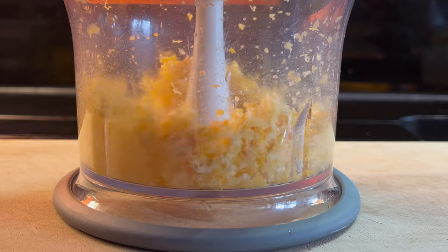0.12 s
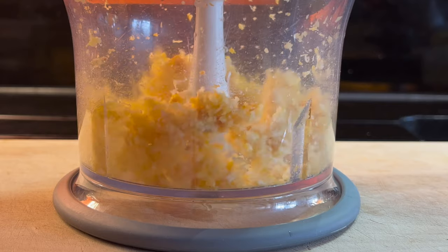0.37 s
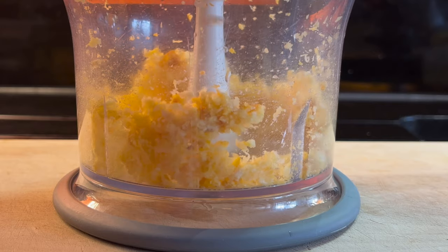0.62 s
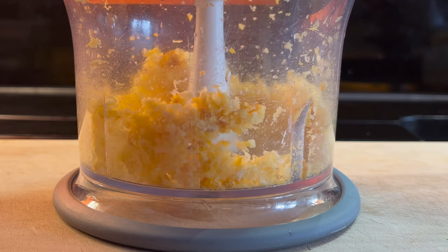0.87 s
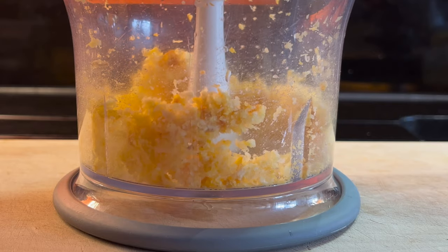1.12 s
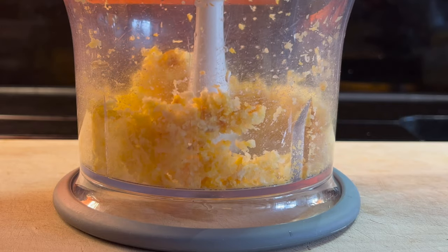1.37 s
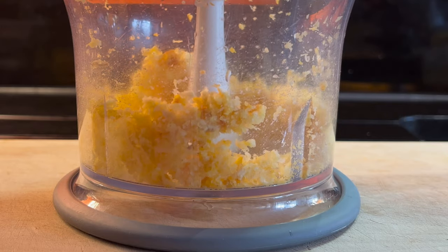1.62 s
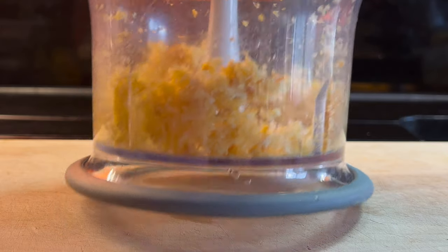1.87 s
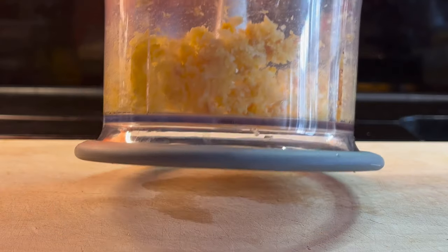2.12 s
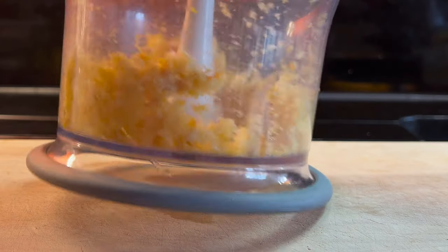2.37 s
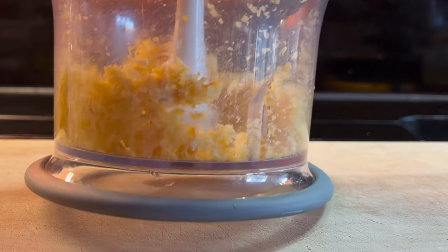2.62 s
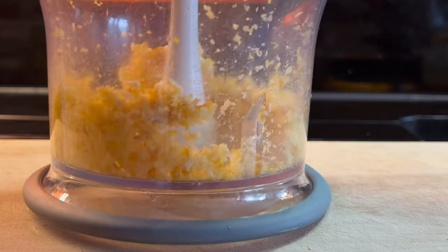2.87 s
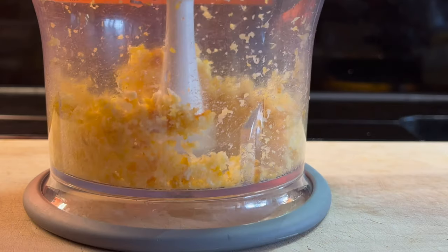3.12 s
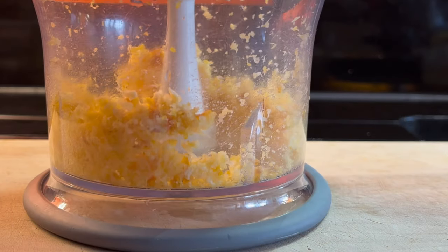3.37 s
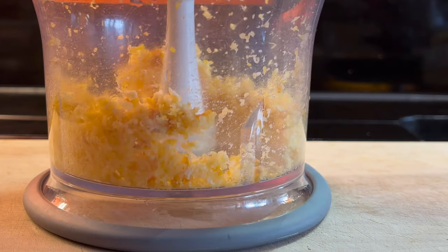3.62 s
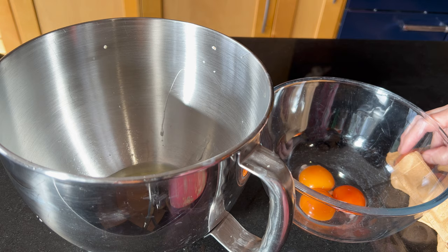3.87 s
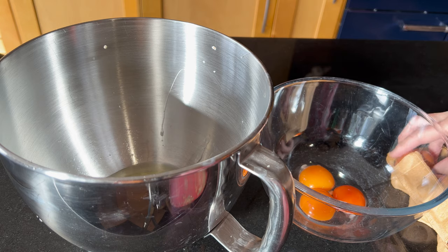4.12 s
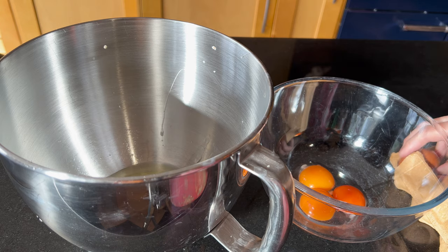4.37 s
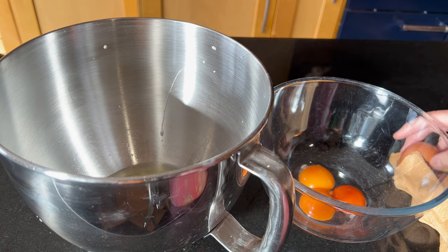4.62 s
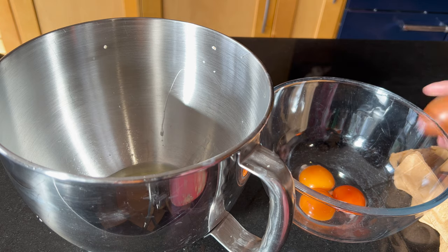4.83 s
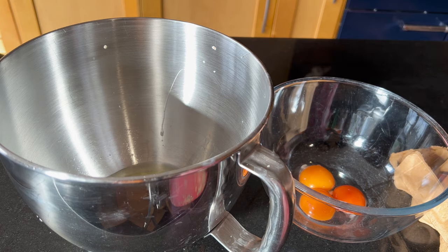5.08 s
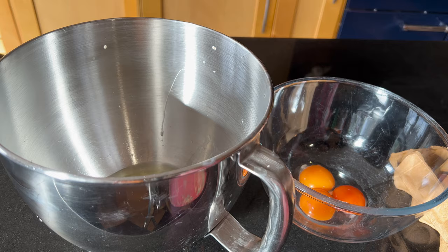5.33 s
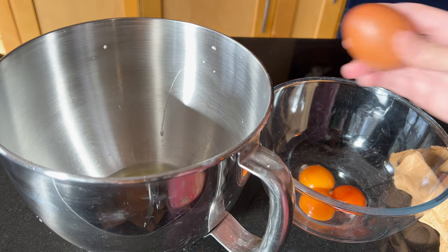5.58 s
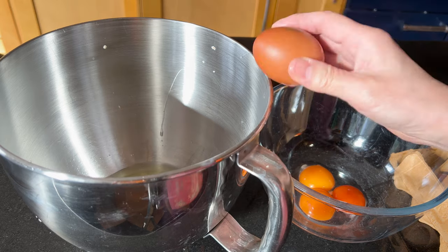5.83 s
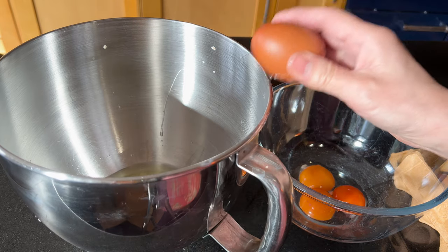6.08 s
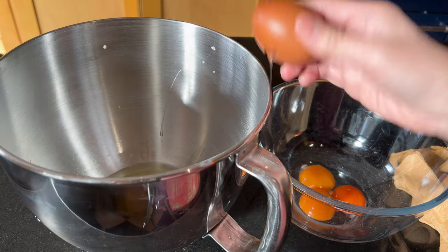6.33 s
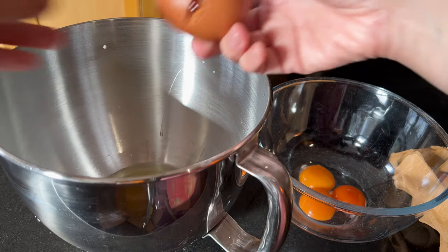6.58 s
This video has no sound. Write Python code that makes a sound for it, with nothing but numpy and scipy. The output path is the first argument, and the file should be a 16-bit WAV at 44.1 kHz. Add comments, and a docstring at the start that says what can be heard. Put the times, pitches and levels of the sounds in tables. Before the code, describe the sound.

Close up, a small electric chopper churns fruit in a plastic cup, with grainy patter, gear whine and lumps knocking the wall. It switches off and runs down, then bursts again. An abrupt change to a quiet, low-humming kitchen brings paper scuffs and tiny clicks, then three egg taps on a steel bowl rim, which rings while its base rocks softly. Close stereo microphones.

```python
"""A small electric chopper whirs through fruit in a plastic cup, twice; each burst fades away.
Motor tones follow a speed curve; churn, patter and cup knocks are shaped noise and ringing modes.
Then a quiet humming kitchen: coloured noise and steady tones, paper scuffs, swishes and ticks.
An egg is tapped three times on the rim of a steel bowl: noise bursts and decaying modes.
The bowl rocks on the worktop and hums. Heard through a close pair of small microphones."""
import sys
import numpy as np
from scipy import signal
from scipy.fft import rfft, irfft, next_fast_len
from scipy.io import wavfile
from scipy.ndimage import uniform_filter1d

SR = 44100
rng = np.random.default_rng(int(sys.argv[2]) if len(sys.argv) > 2 else 0)


def gain_from_db(level_db):
    """Turn a decibel level (scalar or array-like) into a linear amplitude factor."""
    decades = np.asarray(level_db, float) / 20
    return 10 ** decades


def transcribe(signal):
    """Save signal, clipped to [-1, 1], as a 16-bit WAV file at the path in sys.argv[1]."""
    frames = np.atleast_2d(signal).T
    limited = np.clip(frames, -1, 1)
    pcm = np.round(limited * 32767).astype(np.int16)
    wavfile.write(sys.argv[1], SR, pcm)


N = 295902
T_S = np.arange(N) / SR
PAD = next_fast_len(N + SR // 2)
HZ = np.maximum(np.arange(PAD // 2 + 1) * SR / PAD, 1)

# motor runs: (start [s], switch-off [s], faded out [s], gear whine at switch-off [Hz])
MOTOR_RUNS = [(-.5, 1.26, 1.9582, 1003), (2.336, 3.35, 4.1836, 1030)]
# load on the blades: (time [s], chopping level [dB], whine re chopping [dB])
BLADE_LOAD = [(0, -46.5, -7), (.4, -43, -11.5), (.62, -46.5, -5), (.7, -48, -12), (1.2, -48, -13),
              (1.4, -47.5, -24.5), (2.34, -45.5, -26.5), (2.45, -44.5, -2.5), (2.65, -47, -12),
              (2.82, -45.5, -8), (2.95, -45.5, -23), (3.08, -44.5, -21.5), (3.16, -47, -12.5),
              (3.33, -48.5, -19.5), (3.45, -48, -3), (3.55, -47, -7), (3.62, -46, -19.5),
              (3.75, -44.5, -26.5)]
# colour of the churned fruit: (frequency [Hz], density [dB per Hz])
CHURN_COLOUR = [(60, -29.5), (120, -13), (200, -4), (450, -4), (750, -3), (1000, -2.5), (1450, -3.5),
                (1900, -3), (2350, -0.5), (2700, -5.5), (3000, -14), (3600, -14.5), (4200, -27),
                (5000, -43.5)]
# colour of the crumb patter: (frequency [Hz], density [dB per Hz])
PATTER_COLOUR = [(2800, -12.5), (4000, -5), (5200, -6), (6800, -2), (8200, 0), (9700, -4), (10800, 2),
                 (12000, -8.5), (13500, -10.5), (15000, -6.5), (15800, -8), (16300, -47)]
# lumps thrown at the cup wall: (time [s], relative level [dB], relative weight of the low thud [dB])
CUP_KNOCKS = [(0.221, -26.5, -17), (0.297, -27, -34.5), (0.441, -32.5, -31), (0.624, -20.5, -26.5),
              (0.879, -34, -25.5), (0.96, -19.5, -21.5), (1.109, -32, -31.5), (1.167, -32.5, -14.5),
              (1.257, -36.5, -10), (1.638, -37.5, -9.5), (1.678, -57, -6.5), (1.697, -48.5, -4.5),
              (1.79, -54, -6), (2.336, -38, -3.5), (2.349, -33.5, -8), (2.38, -37, -9), (2.412, -40, -9.5),
              (2.434, -45.5, -1.5), (2.614, -26.5, -12.5), (2.762, -40.5, -4.5), (2.812, -37, -3),
              (2.861, -27, -10), (2.887, -34.5, -11), (2.986, -32, -8.5), (2.997, -38.5, -5),
              (3.013, -39.5, -4), (3.061, -36.5, -5.5), (3.074, -24.5, -9.5), (3.085, -34, -10.5),
              (3.097, -28.5, -13.5), (3.303, -28.5, -13), (3.565, -42, -6.5), (3.699, -41, -8.5),
              (3.741, -37, -9.5)]
# cup modes: (frequency [Hz], relative level [dB], t60 [s])
CUP_MODES = [(384, -1.5, 0.053), (598, 6.5, 0.015), (910, -4, 0.013), (1740, -29.5, 0.0049),
             (2307, 1, 0.02), (2815, -8.5, 0.013), (6985, -7.5, 0.016)]
# sagging tones: (start [s], end [s], level [dB], frequency [Hz], sag [Hz/s])
CUP_DRONES = [(2.79, 3.071, -53.5, 614.8, 130), (3.08, 3.268, -56, 369, 18.2)]
# kitchen air: (frequency [Hz], density [dB per Hz])
KITCHEN_COLOUR = [(25, -9.5), (50, 8), (100, 3.5), (200, 1.5), (400, -6), (700, -9.5), (1000, -17),
                  (1500, -23.5), (2500, -18.5), (3100, -22.5), (3550, -21), (4000, -26.5), (5600, -24.5),
                  (7000, -30.5), (10000, -38), (15700, -41), (16300, -65.5)]
# steady appliance tones: (frequency [Hz], level [dB])
APPLIANCES = [(49, -75), (195, -71), (300, -71), (1023, -70), (1793, -85)]
# dull scuffs of a hand among paper and eggs: (peak [s], level [dB], 20 dB rise [s], 20 dB fall [s])
HAND_SCUFFS = [(3.905, -49, 0.0038, 0.0453), (4.04, -53.5, 0.012, 0.0062), (4.33, -68, 0.71, 0.57),
               (4.555, -54, 0.0236, 0.0979), (4.62, -55, 0.005, 0.1822), (4.66, -58, .03, 0.1421),
               (4.86, -58, 0.135, 0.1647)]
# bright swishes of the same hand: (peak [s], level [dB], 20 dB rise [s], 20 dB fall [s])
HAND_SWISHES = [(4.018, -57, 0.008, 0.015), (4.29, -99.5, 0.126, 0.079), (4.71, -45.5, 0.0636, 0.087),
                (4.88, -73.5, 0.22, 0.9), (5.348, -68.5, 0.045, 0.19), (5.758, -67.5, 0.0224, 0.05)]
# small clicks: (time [s], relative level [dB], frequency [Hz])
HAND_TICKS = [(3.906, -36.5, 934), (4.018, -41.5, 1350), (4.0352, -40.5, 1563), (4.152, -42, 1004),
              (4.468, -46.5, 750), (4.552, -46, 1500), (4.6169, -38, 1140), (4.632, -42.5, 1245),
              (4.652, -46, 1710)]
# egg on rim, softer as the shell gives way:
# (time [s], strength [dB], contact [ms], lean to the lower modes [dB])
EGG_TAPS = [(5.903, -10.5, 0.892, 5), (6.096, -12.5, 3.2, -3), (6.291, -17, 6.0, 1.5)]
# hollow knock of the egg: (frequency [Hz], level re mean of strength and crack [dB], t60 [s])
EGG_SHELL = [(1012.4, -11, 0.023), (1296, -10.0, 0.031)]
# steel bowl modes: (frequency [Hz], relative level [dB], t60 [s])
BOWL_MODES = [(602, -4, .25), (680, -4, .5), (896, 0, .13), (1087, -19, .9), (1230, -12, .75),
              (1405, -10, .45), (1555, -8, .42), (1726, -13, .8), (2003, -8, .29), (2185, -9, .28),
              (2406, -3, .12), (2589, -11, .29), (3475, -19, .35), (3677, -24, .2), (4344, -11, .4),
              (4450, -11, .4), (4600, -12, .36), (4912, -5, .28), (5133, -4, .32), (5652, -13, .35),
              (6013, -9, .22), (6400, -14, .3), (6660, -7, .25), (7004, -8, .25), (7300, -9, .26),
              (7461, -7, .27), (7645, -7, .3), (8330, -8, .2)]
# dense upper ring of the bowl: (frequency [Hz], relative density [dB per Hz], t60 [s])
BOWL_SHIMMER = [(303, 0.5, 1), (704, -4, 0.912), (1500, -4.5, 0.514), (2385, 1, 0.395), (3160, -9, .3),
                (3972, -10, 0.61), (4310, 0.5, 0.404), (7907, 2.5, 0.338), (10040, -3.5, .26),
                (10930, -5, 0.22), (13870, -9, .2), (15470, -11, .15), (16500, -21, .05)]
# jolts of the base after every tap: (delay [s], relative level [dB])
BASE_JOLTS = [(.004, -2), (0.0186, 0.5)]
# bowl rocking on its base: (time [s], relative level [dB])
BASE_ROCKS = [(6.01, -17.5), (6.05, -24), (6.148, -29.5), (6.177, -30.5), (6.237, -31.5), (6.359, -18.5),
              (6.389, -38), (6.46, -36.5), (6.567, -38)]
# worktop contact modes: (frequency [Hz], relative level [dB], t60 [s])
BASE_MODES = [(463.7, 2.5, 0.093), (494.2, -1, 0.1854), (367, -12.5, 0.03)]
# microphone pair: (frequency [Hz], left-right likeness [0-1], left re right [dB])
MIC_PAIR = [(100, 0.7, 1), (412, 0.83, -1), (718, 0.3, 0.5), (990, 0.3, 4), (1500, 0.36, 0), (2310, 0.5, 3),
            (3860, 0, 3), (5500, 0, 8.5), (6940, 0, 4), (9655, 1, 1), (9200, 1, -5), (9560, 0.98, -1.5),
            (10218, 0.99, 1.5), (11215, 0.94, -5.5), (11600, 0.4, 8), (13400, 0.9, -2.5), (15000, .6, 1)]
# phase lead of the right side, whatever the direction: (frequency [Hz], phase [half turns])
RIGHT_LEAD = [(6500, 0), (8000, .35), (9000, .7), (9700, .97), (10400, 1.03), (11000, 1.2), (12000, 1.6),
              (13400, 2), (16000, 2.8)]
# where the bowl radiates: (frequency [Hz], left re right [dB])
BOWL_SIDE = [(200, -5.5), (450, 8.5), (700, 10), (1000, -7), (1500, -4.5), (2300, 0.5), (3200, 0),
             (16000, -0.5)]
# remaining noise colours: (frequency [Hz], density [dB per Hz])
RUMBLE_COLOUR = [(25, -18), (60, 7.0), (130, 6), (220, -3.5), (350, -13.0), (600, -39.5)]
SCUFF_COLOUR = [(500, -18.5), (1100, 3), (1800, 3), (3000, -5.5), (5000, -15.5), (7000, -20.0)]
SWISH_COLOUR = [(4000, -8.5), (7000, -2.5), (9000, 7.0), (11000, 1.5), (13500, -5.0), (15700, -16.0),
                (16300, -52.0)]
HISS_COLOUR = [(2000, -18.5), (4000, -5.0), (6000, -1), (15700, -2.5), (16300, -46.5)]
WOBBLE_COLOUR = [(80, -21.0), (125, -3.5), (154, 7.0), (180, -0.5), (280, -43.5)]
DRAUGHT_COLOUR = [(20, -17.5), (50, 6.5), (110, 3.5), (200, -28.5), (400, -91.5)]

WHINE_PER_MOTOR_TURN = 4.5
SPIN_UP_HZ, SPIN_UP_S = 134.45, .1   # speed missing at the start, how fast it is won
CREEP_HZ_PER_S = 20.0   # slow gain as the fruit gets finer
COAST_HZ, COAST_S = 419.4, .25   # without power the whine sinks towards this pitch
COAST_DB_PER_S, COAST_TREBLE_DB_PER_S, COAST_HUM_DB = 12.5, 2, -16.5
COAST_THINS_DB, THIN_BELOW_HZ = -3.0, 750   # idling blades move little fruit: the lows thin out
FADE_S, FADE_LEAVES_DB = 0.848, -40.5
FADE_DULLS = 0.4   # extra share of the fade lost by the treble
FADE_TOE_DB, FADE_TOE_S = -33.5, 0.071   # the fade lands softly
PATTER_DB, PATTER_LOAD_DB = -2.5, -46.5   # patter re chopping, at this load
PATTER_FOLLOWS, PATTER_RISE_S = 0.69, 0.04   # share of the load's swing
MOTOR_HUM_DB = -11   # re chopping
KITCHEN_S, KITCHEN_DB = 3.895, -56
SCUFF_FLOOR_DB, SWISH_FLOOR_DB, RESTLESS_DB = -73.5, -82.5, 2   # until the first tap
CRACK_DB, CRACK_LOSS_DB_PER_MS2 = 12.5, 2.05
CRUNCH_T60_S, CRUNCH_T60_S_PER_MS = 0.019, 0.01004
RING_DB, RING_LEANS = (-22, -16.5, -16), (0.61, 0.94, -0.69)   # low, middle, high modes; lean share
SHELL_DAMPS_DB_PER_MS = 0.88   # a longer touch leaves less lasting ring
WOBBLE_DB, WOBBLE_LOSS_DB_PER_MS = -24.0, 2.5
JOLT_LEANS = 0.584   # share of a tap's lean that reaches the base
HUM_HZ, HUM_T60_S, HUM_DB = 347.07, 2.9, -37.5   # level re each contact
SETTLE_S, SETTLE_DB = 6.335, -37.5   # the bowl settles and hums freely
DRAUGHT_S, DRAUGHT_RISE_S, DRAUGHT_DB = 6.1, .05, -61.5


def rms_one(x):
    """Scale to rms 1."""
    return x / np.sqrt(np.mean(x ** 2) + 1e-20)


def white():
    """White noise of rms 1."""
    return rng.standard_normal(N)


def in_time(rows):
    """Columns of a curve at every sample."""
    s, *columns = np.transpose(rows)
    return [np.interp(T_S, s, c) for c in columns]


def at_hz(rows, hz, axis=1):
    """One column of a frequency table, interpolated over log frequency."""
    return np.interp(np.log(hz), np.log(np.array(rows)[:, 0]), np.array(rows)[:, axis])


def coloured(x, spectrum):
    """Impose a spectrum; rms 1."""
    return rms_one(irfft(rfft(x, PAD) * gain_from_db(at_hz(spectrum, HZ)), PAD)[:N])


def above(x, cut_hz):
    """Steep high-pass."""
    return signal.sosfilt(signal.butter(4, cut_hz, "high", fs=SR, output="sos"), x)


def drift(corner_hz):
    """Slow random wander of spread 1: noise through two equal poles, at SR / 40."""
    r = np.exp(-80 * np.pi * corner_hz / SR)
    slow = signal.lfilter([1], [1, -2 * r, r * r], rng.standard_normal(N // 40 + 2002))[2000:]
    return np.interp(np.arange(N) / 40, np.arange(len(slow)), rms_one(slow))


def clicks(seconds, db):
    """Single-sample impulses of given levels."""
    out = np.full(N, 1e-18)
    out[np.round(np.asarray(seconds) * SR).astype(int)] = gain_from_db(db)
    return out


def ring(x, hz, t60_s):
    """A click sets a sine of its own height ringing."""
    r, w = gain_from_db(-60 / (t60_s * SR)), 2 * np.pi * hz / SR
    return signal.lfilter([0, np.sin(w)], [1, -2 * r * np.cos(w), r * r], x)


def dying(x, t60_s):
    """A click starts an exponential decay."""
    return signal.lfilter([1], [1, -gain_from_db(-60 / (t60_s * SR))], x)


def grains(per_s, spread_db):
    """Random clicks of uneven size; rms 1."""
    sizes = gain_from_db(spread_db * np.minimum(rng.exponential(1, N), 4)) * rng.choice([-1, 1], N)
    return rms_one(sizes * (rng.random(N) < per_s / SR))


def motor_runs():
    """Whine [Hz], time since start [s], coasting [s], fade [dB]; the kitchen cuts the last run short."""
    start, off, end, top_hz = np.array(MOTOR_RUNS)[(T_S >= MOTOR_RUNS[1][0]).astype(int)].T
    since, coasting = T_S - start, np.maximum(T_S - off, 0)
    creep_hz = CREEP_HZ_PER_S * np.maximum(off - T_S, 0)
    powered_hz = top_hz - creep_hz - SPIN_UP_HZ * np.exp(-since / SPIN_UP_S)
    whine_hz = COAST_HZ + (powered_hz - COAST_HZ) * np.exp(-coasting / COAST_S)
    toe = gain_from_db(FADE_TOE_DB) * np.exp(-np.maximum(T_S - end, 0) / FADE_TOE_S)
    fade = np.clip((end - T_S) / FADE_S, 0, 1) + gain_from_db(FADE_LEAVES_DB) + toe
    fade_db = 20 * np.log10(fade) - 300 * np.maximum(T_S - KITCHEN_S, 0)
    return whine_hz, since, coasting, fade_db


def chopper():
    """Blades churn fruit in clumps, crumbs patter on the cup, gears whine over the motor hum."""
    whine_hz, since, coasting, fade_db = motor_runs()
    load_db, whine_db = in_time(BLADE_LOAD)
    chop_db = load_db - COAST_DB_PER_S * coasting + fade_db

    clumps = gain_from_db(1.447 * drift(75) + .5 * drift(12))
    churn = coloured(clumps * (white() + .6 * grains(per_s=500, spread_db=3.5)), CHURN_COLOUR)
    lows = signal.sosfilt(signal.butter(1, THIN_BELOW_HZ, fs=SR, output="sos"), churn)
    churn = churn - (1 - gain_from_db(COAST_THINS_DB * np.clip(coasting / 0.31, 0, 1))) * lows

    patter_db = PATTER_DB - (1 - PATTER_FOLLOWS) * (load_db - PATTER_LOAD_DB)
    patter_db = patter_db - COAST_TREBLE_DB_PER_S * coasting + FADE_DULLS * fade_db
    patter_db = patter_db - 10 * np.exp(-since / PATTER_RISE_S)
    crumbs = white() + .35 * grains(per_s=600, spread_db=5.0)
    patter = gain_from_db(patter_db) * coloured(clumps * gain_from_db(1.4 * drift(130)) * crumbs, PATTER_COLOUR)

    # the speed wavers slightly, and more as the blades run down
    waver = (0.001 + 0.0428 * np.minimum(coasting, .3)) * drift(24)
    turn = 2 * np.pi * np.cumsum(whine_hz * (1 + waver)) / SR
    overtone = gain_from_db(-4.5) * np.sin(1.9 * turn) * (whine_hz / 1030) ** 8
    whine = gain_from_db(whine_db + 3.0 * drift(10)) * (np.sin(turn) + overtone)
    # hum is weak at the start and while coasting
    weak = np.clip(coasting / 0.143 + np.exp(-(since / 0.107) ** 2), 0, 1)
    hum_db = MOTOR_HUM_DB + COAST_HUM_DB * weak + 2.2 * drift(11)
    hum = gain_from_db(hum_db) * np.sin(turn / WHINE_PER_MOTOR_TURN)
    # freed blades whir roughly as they run down
    slowing = np.clip(1 - whine_hz / 980, 0, 1)
    whir = 3.84 * slowing * np.exp(-(coasting / 0.483) ** 2) * drift(90) * np.sin(1.68 * turn)

    room_tone = gain_from_db(-81.5 + .12 * fade_db) * coloured(white(), RUMBLE_COLOUR)
    machine = gain_from_db(chop_db) * (gain_from_db(1.0) * churn + patter + whine + hum + whir)
    return machine + knocks() + drones() + room_tone


def knocks():
    """Each lump cracks on the wall and rings the cup; the knocks carry no deep bass."""
    s, level_db, thud_db = np.transpose(CUP_KNOCKS)
    level_db = level_db - 7.5
    luck_db = rng.normal(0, 1.5, (len(s), len(CUP_MODES)))
    rings = 0
    for k, (hz, db, t60_s) in enumerate(CUP_MODES):
        mode_db = level_db + db + (thud_db + 6) * (hz < 1100) + luck_db[:, k]
        late_s = 0.003 * (hz < 800)   # the lowest modes answer late
        rings = rings + ring(clicks(s + late_s, mode_db), hz, t60_s)
    crack = coloured(white(), CHURN_COLOUR) * dying(clicks(s, level_db), 0.013)
    return above(rings + crack, 220)


def drones():
    """Short wavering tones that sag in pitch, as if packed fruit set the cup humming."""
    out = 0
    for start, end, db, hz, sag in CUP_DRONES:
        t = T_S - start
        gate = np.clip(np.minimum(t, end - T_S) / .03, 0, 1)
        out = out + gain_from_db(db + 3.0 * drift(24)) * gate * np.sin(2 * np.pi * (hz - sag * t / 2) * t)
    return out


def strokes(rows, floor_db):
    """Each stroke swells to its peak and falls away; a restless floor lasts until the first tap."""
    out = gain_from_db(floor_db + RESTLESS_DB * drift(12.5)) * (T_S < EGG_TAPS[0][0])
    for s, db, rise, fall in rows:
        out = out + gain_from_db(db - 20 * np.maximum((s - T_S) / rise, (T_S - s) / fall))
    return out


def kitchen():
    """Rumble, faint hiss and appliance tones, with a hand rustling and clicking nearby."""
    air = gain_from_db(KITCHEN_DB + 1.06 * drift(10.4)) * coloured(white(), KITCHEN_COLOUR)
    tones = sum(gain_from_db(db + 1.6 * drift(8.9)) * np.sin(2 * np.pi * hz * T_S) for hz, db in APPLIANCES)
    fibres = rng.standard_normal((2, N)) + [[.45], [.15]] * grains(per_s=800, spread_db=4.5)
    scuff = strokes(HAND_SCUFFS, SCUFF_FLOOR_DB) * gain_from_db(2.5 * drift(50))
    scuff = scuff * coloured(fibres[0], SCUFF_COLOUR)
    swish = strokes(HAND_SWISHES, SWISH_FLOOR_DB) * coloured(fibres[1], SWISH_COLOUR)
    bright = above(fibres[1], 1500)
    ticks = 0
    for s, db, hz in HAND_TICKS:
        ticks = ticks + ring(clicks([s], db - 1.0), hz, 0.0157)
        ticks = ticks + gain_from_db(-18) * dying(clicks([s], db), 0.0049) * bright
    # a faint hiss stops just before the first tap
    hiss = gain_from_db(-74.0) * (T_S < 5.9) * coloured(white(), HISS_COLOUR)
    opening = np.clip((T_S - KITCHEN_S) / 0.0064, 0, 1)
    return (air + hiss + tones + scuff + swish) * opening + ticks


def tap_ring_db(order):
    """Strength of the low (0), middle (1) or high (2) bowl modes at each tap."""
    s, strength_db, contact_ms, lean_db = np.transpose(EGG_TAPS)
    return strength_db + RING_DB[order] + RING_LEANS[order] * lean_db


def tap_swell(t60_s):
    """Envelope of the taps: each swells over its contact time, then decays with its own t60."""
    out = 0
    for (s, db, contact_ms, lean), fall_s in zip(EGG_TAPS, t60_s):
        rise_t60_s = 7 * contact_ms / 1000
        rise = dying(clicks([s], db), rise_t60_s) * (1 - gain_from_db(-60 / (rise_t60_s * SR)))
        out = out + dying(rise, fall_s)
    return out


def egg_on_bowl():
    """A tap is a sharp crack, a crunch of shell, ringing bowl modes and a dense ring dying by band."""
    s, strength_db, contact_ms, lean_db = np.transpose(EGG_TAPS)
    hit_s = s + contact_ms / 1000
    crack_db = strength_db + CRACK_DB - CRACK_LOSS_DB_PER_MS2 * contact_ms ** 2
    luck_db = rng.normal(0, 2.5, (len(s), len(BOWL_MODES)))
    out = dying(clicks(s, crack_db), 0.00063) * white()
    crunch = coloured(grains(per_s=5100, spread_db=3.0), BOWL_SHIMMER)
    out += crunch * tap_swell(CRUNCH_T60_S + CRUNCH_T60_S_PER_MS * contact_ms)
    for hz, db, t60_s in EGG_SHELL:
        out += ring(clicks(hit_s, (strength_db + crack_db) / 2 + db), hz, t60_s)

    for k, (hz, db, t60_s) in enumerate(BOWL_MODES):
        order = int(hz > 1000) + int(hz > 3000)
        blow_db = tap_ring_db(order) + db + luck_db[:, k]
        out += ring(clicks(hit_s, blow_db - SHELL_DAMPS_DB_PER_MS * contact_ms), hz, t60_s)
        # a briefer second ring; an uneven bowl splits its high modes in two
        split = 1 + .005 * (hz > 3000)
        out += ring(clicks(hit_s, blow_db + 1.5), hz / split, t60_s * 0.195)

    noise = rng.standard_normal((2, N))
    for k, low_hz in enumerate(280 * 2 ** np.arange(0, 6, .5)):   # half-octave bands
        sos = signal.butter(2, [low_hz, low_hz * np.sqrt(2)], "band", fs=SR, output="sos")
        mid_hz = low_hz * 2 ** .25
        band = signal.sosfilt(sos, noise[k % 2]) * gain_from_db(at_hz(BOWL_SHIMMER, mid_hz) - 10.5)
        out += band * tap_swell([at_hz(BOWL_SHIMMER, mid_hz, axis=2)] * len(s))
    return above(out, 282.4)


def sideways_ring():
    """One bowl mode points its two lobes at the two ports, which hear it in opposite phase."""
    blows = clicks(np.transpose(EGG_TAPS)[0], tap_ring_db(order=0) + 1.5)
    return ring(blows, 680, 0.96) * [[1], [-1]]


def wobble():
    """The struck bowl shakes the worktop: a low wavering tone, partly unlike in the two channels."""
    s, strength_db, contact_ms, lean_db = np.transpose(EGG_TAPS)
    mid, side = [coloured(white(), WOBBLE_COLOUR) for part in range(2)]
    blows = clicks(s, strength_db + WOBBLE_DB - WOBBLE_LOSS_DB_PER_MS * contact_ms)
    swell = dying(blows, 0.0262) * (1 - gain_from_db(-60 / (0.0321 * SR)))
    return (mid + gain_from_db(-6.0) * side * [[1], [-1]]) * dying(swell, 1.45)


def rocking():
    """Soft contacts with the worktop: a short hollow knock that swells, and a lasting hum."""
    jolts = [(s + later_s, db + jolt_db - 0.5 + JOLT_LEANS * lean)
             for s, db, ms, lean in EGG_TAPS for later_s, jolt_db in BASE_JOLTS]
    s, level_db = np.transpose(jolts + list(BASE_ROCKS))
    out = sum(ring(clicks(s, level_db + db - 6), hz, t60_s) for hz, db, t60_s in BASE_MODES)
    hum_blows = clicks(s, level_db + HUM_DB) + clicks([SETTLE_S], SETTLE_DB)
    out += ring(hum_blows, HUM_HZ, HUM_T60_S)
    return signal.sosfilt(signal.butter(3, [310, 620], "band", fs=SR, output="sos"), out)


def draught():
    """Air stirred by the hand buffets each port on its own: low lumpy noise, unrelated per channel."""
    rise = np.clip((T_S - DRAUGHT_S) / DRAUGHT_RISE_S, 0, 1)
    return gain_from_db(DRAUGHT_DB) * rise * np.array([coloured(white(), DRAUGHT_COLOUR) for side in range(2)])


def microphones(x, left_lead_s, scatter_t60_s, scattered, balance_db=0):
    """The right side hears the left's sound shifted in phase, blended with scattered reflections."""
    tail_s = np.arange(SR // 2) / SR
    scatter = rfft(rng.standard_normal(SR // 2) * gain_from_db(-60 * tail_s / scatter_t60_s), PAD)
    # reflections keep the colour
    scatter /= np.sqrt(uniform_filter1d(np.abs(scatter) ** 2, size=PAD // 400))
    alike = 1 - np.clip(scattered, 0, 1) * (1 - np.clip(at_hz(MIC_PAIR, HZ), 0, 1))
    side = gain_from_db((at_hz(MIC_PAIR, HZ, axis=2) + balance_db) / 2)
    # the direction delay vanishes towards the treble
    low_share = np.clip(1 - (HZ / RIGHT_LEAD[0][0]) ** 3, 0, 1)
    phase = -2 * np.pi * HZ * left_lead_s * low_share + np.pi * at_hz(RIGHT_LEAD, HZ)
    left = rfft(x, PAD)
    right = left * (alike * np.exp(1j * phase) + np.sqrt(1 - alike ** 2) * scatter)
    return irfft([left * side, right / side], PAD)[:, :N]


def scene():
    """Each source through the pair has its own lead, balance and share of scattered reflections."""
    mix = microphones(egg_on_bowl(), .00004, 0.053, 0.77, at_hz(BOWL_SIDE, HZ))
    mix = mix + microphones(rocking(), 0.000283, 0.0653, 1.0, -3.5)
    mix = mix + microphones(chopper(), .00005, 0.11, 0.571)
    mix = mix + microphones(kitchen(), -0.000091, 0.17, 0.978, -1.1)
    return mix + wobble() + sideways_ring() + draught()


def low_pass(x):
    """Removes everything above the highest recorded frequency."""
    return signal.sosfilt(signal.butter(12, 17110, fs=SR, output="sos"), x)


def record(dry):
    """Peaks are rounded by a soft limit, the top is cut by a steep low-pass."""
    rounded = .95 * np.tanh(dry / .95)
    cut = signal.sosfilt(signal.cheby2(8, 40, 17000, fs=SR, output="sos"), rounded)
    return low_pass(cut)


dry = scene()
out = record(dry)
transcribe(out)
```